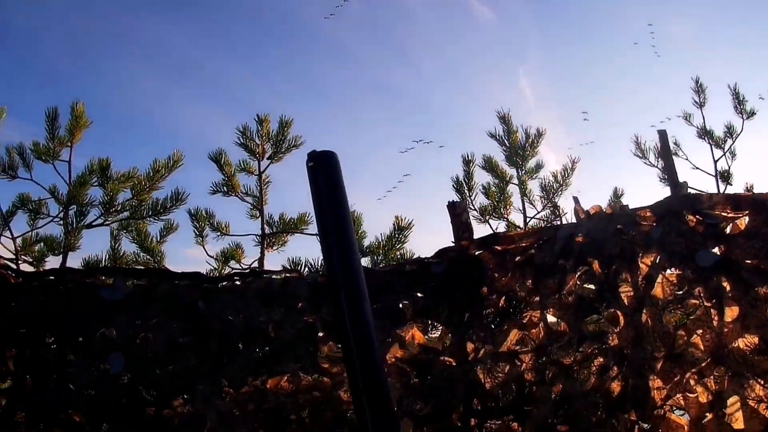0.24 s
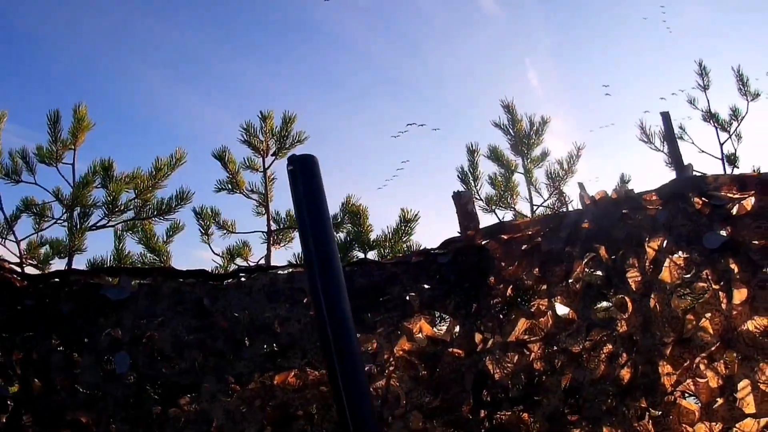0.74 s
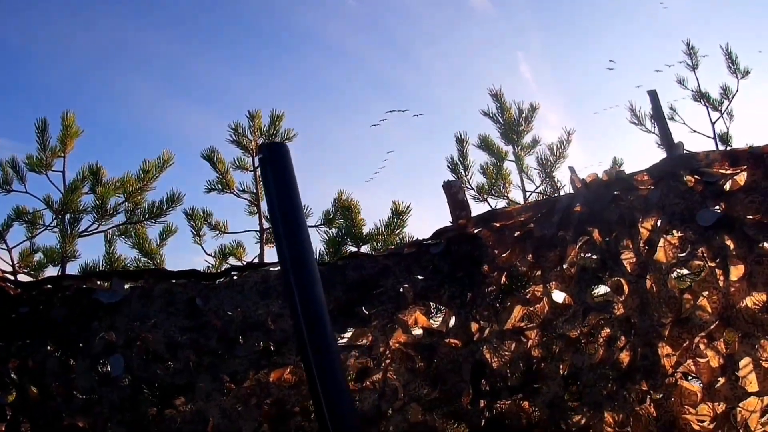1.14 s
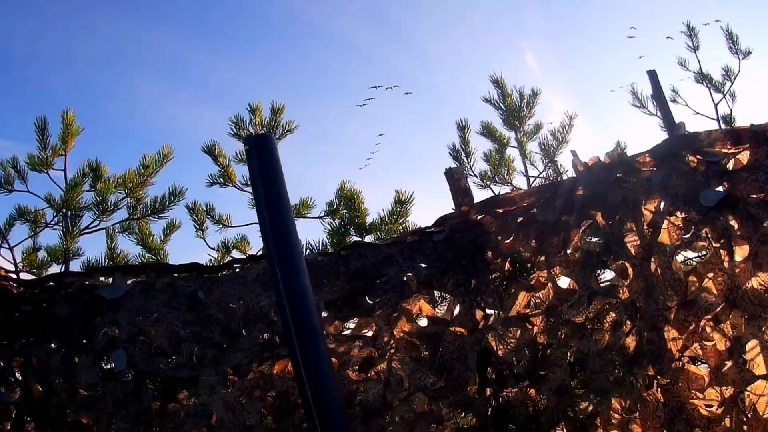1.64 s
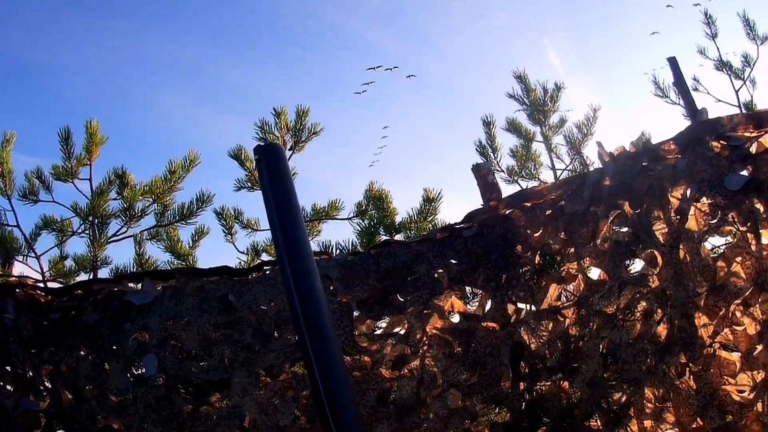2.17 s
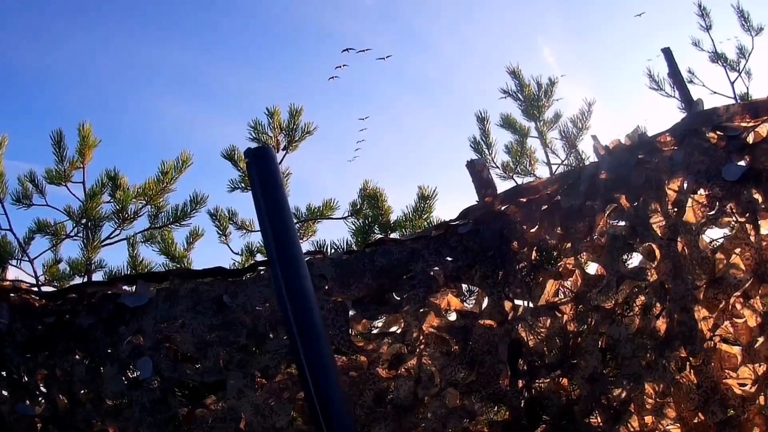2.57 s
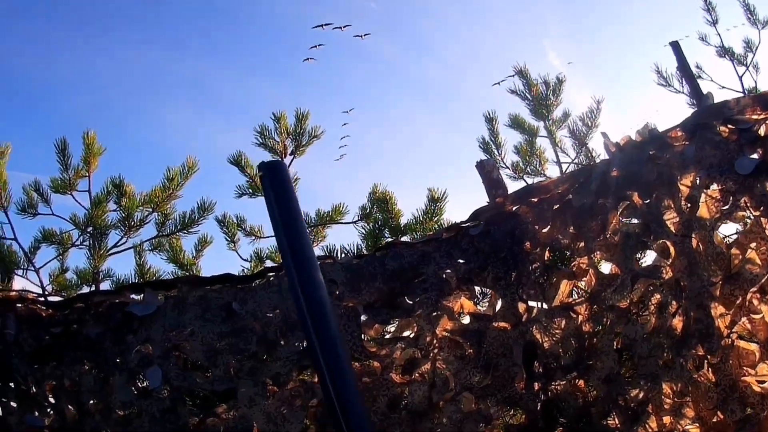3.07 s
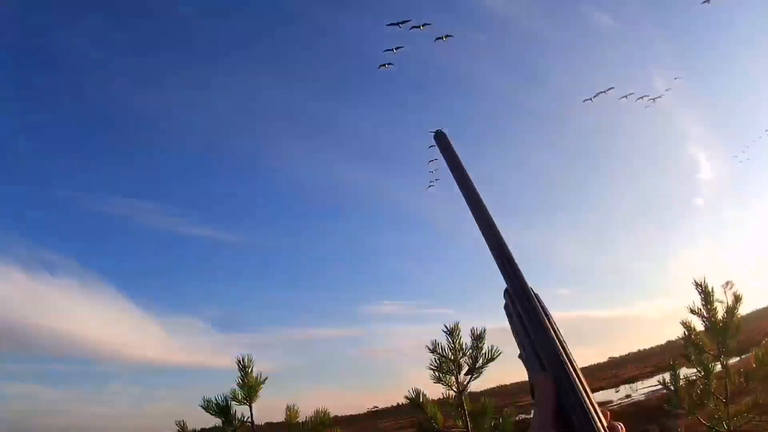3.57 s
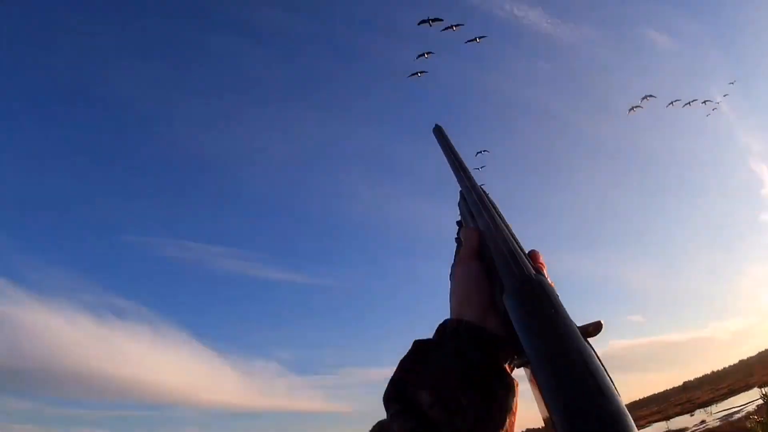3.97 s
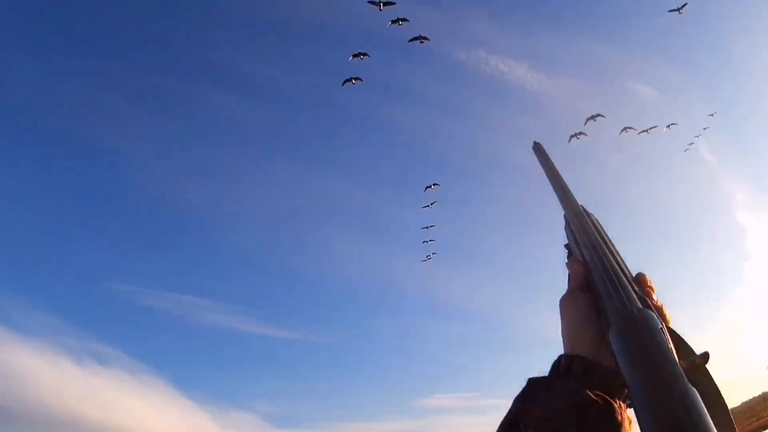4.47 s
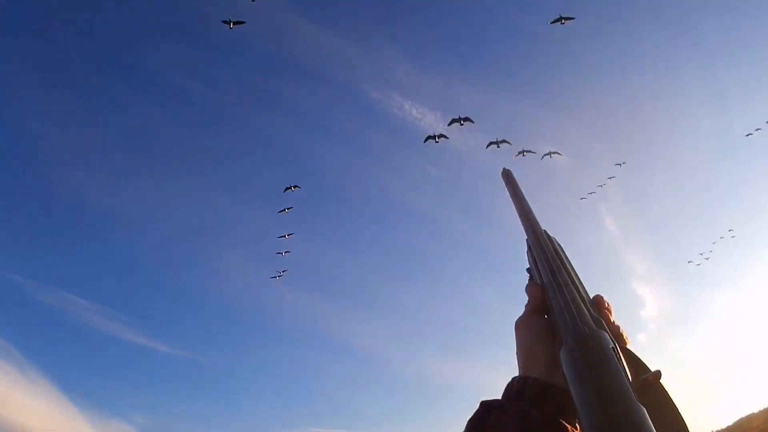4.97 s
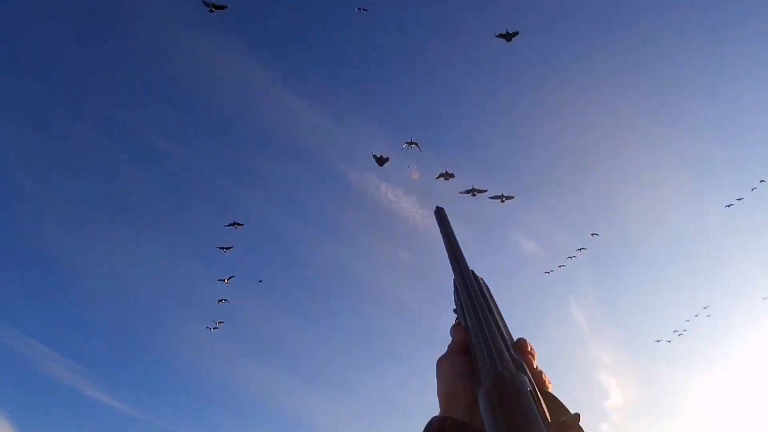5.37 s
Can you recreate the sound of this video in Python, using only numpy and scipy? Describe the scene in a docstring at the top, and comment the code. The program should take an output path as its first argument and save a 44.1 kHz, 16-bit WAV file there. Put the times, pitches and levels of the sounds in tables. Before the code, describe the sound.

Outdoors, heard from a hunter's own position: a restless goose chorus with brief single honks standing out, swelling and dipping in loudness. Midway come small gun clicks, a soft low stock thud and muffled clothing. Near the end a very loud, clipped blast hits, followed by quick steel clatter and a fading, noisy rumble across the open land. The sound is the same on both channels.

```python
"""Geese are heard first, over a hide on an open bog: single honks out of a rough, swelling chorus.
Each honk is a stack of harmonics through windpipe and beak; the air is a soft hiss of coloured noise.
In the hide a hunter makes ticks of metal and bumps of cloth, and the stock thuds on the shoulder.
One shot of a self-loading shotgun, a burst of noise, overloads the microphone; the bolt slams back and
forward as ringing steel, and the report rolls away over the bog as slowly fading noise."""
import sys
import numpy as np
from scipy import signal
from scipy.fft import rfft, irfft, next_fast_len
from scipy.io import wavfile
from scipy.ndimage import uniform_filter1d

SR = 44100
rng = np.random.default_rng(int(sys.argv[2]) if len(sys.argv) > 2 else 0)


def unload_audio(sound):
    """Save the sound as a 16-bit wav file, at the path given as the first command line argument."""
    columns = np.transpose(np.atleast_2d(sound))
    # keep every value between -1 and 1, then stretch to whole-number steps
    steps = np.round(np.clip(columns, -1, 1) * 32767)
    wavfile.write(sys.argv[1], SR, steps.astype(np.int16))


N = 247401  # samples

# Colour of the open air, relative: (f/Hz, level/dB)
AIR_COLOUR = [(13, -28), (22, -1.5), (740, -3.5), (897, -2), (1120, 6.5), (1880, -15.5), (3090, -19),
              (7240, -33), (7860, -18), (9020, -27), (10300, -25.5), (15600, -25)]
AIR_DB = -55.5  # before its slow wavering

# Chorus of the whole flock, swelling and pausing, before FLOCK_TRIM_DB: (t/s, level/dB)
FLOCK_LEVEL = [(0.0, -51), (0.06, -39.5), (0.35, -43), (0.53, -54), (0.72, -45), (0.76, -60), (0.92, -34.5),
               (1.07, -47.5), (1.64, -38.5), (1.77, -42.5), (1.85, -38.5), (1.88, -47), (2.05, -36),
               (2.42, -54), (2.48, -38.5), (2.64, -37), (2.7, -42.5), (3.13, -39), (3.19, -56.5),
               (3.33, -38), (3.39, -52), (3.49, -38.5), (3.58, -52.5), (3.71, -37.5), (4.17, -39),
               (4.27, -47), (4.48, -36), (4.56, -47.5), (4.64, -38), (4.86, -43.5), (4.89, -53.5),
               (4.97, -41.5), (5.05, -55), (5.15, -36), (5.21, -48.5), (5.27, -42)]
# Kinds of voice in the flock: (pitch f/Hz, pitch spread/share)
FLOCK_VOICES = [(270.6, .06), (457.6, 0.09), (869.4, 0.074), (300.5, 0.071)]
# Overtones above the beak in the flock, relative: (f/Hz, level/dB)
FLOCK_OVERTONES = [(1710, -15), (2900, -59), (3490, -21), (4150, 7), (6440, 9), (7040, 9), (9930, -2.5),
                   (15000, -18)]
FLOCK_TRIM_DB, FLOCK_TREBLE_DB = -1.5, -21.5

# Honks of near birds, pitch taken mid-call, windpipe and treble relative to the beak:
# (t/s, length/s, pitch f/Hz, glide start to end/share of pitch, level/dB, windpipe level/dB, treble level/dB)
NEAR_HONKS = [(0.045, 0.065, 296, -0.013, -47.5, -13, -20), (0.113, 0.13, 436.0, -0.11, -66, 12, -28.0),
              (0.215, 0.12, 268.3, -0.017, -41.5, -16, -22), (0.281, 0.1, 323, -0.056, -45.5, -19.0, -14),
              (0.363, 0.069, 320.6, -0.047, -48.5, -27, -9), (0.448, 0.082, 306.5, 0.024, -53, -3, -20.0),
              (0.544, 0.15, 283, -0.0088, -67, 9.5, -2), (0.786, 0.095, 498.0, -0.073, -50.5, -17, -20),
              (0.851, 0.16, 822, -0.059, -51.5, 2.5, -23),
              (0.856, 0.14, 274.6, -0.037, -44.5, -20.0, -36.0),
              (0.956, 0.11, 445, -0.14, -45.5, -3, -27.0), (1.105, 0.061, 288, -0.053, -48.5, -14.0, -33),
              (1.173, 0.15, 423, -0.12, -55.5, 3.5, -20), (1.3, 0.091, 305, 0.09, -53, -12.0, -37),
              (1.405, 0.22, 414.6, -0.039, -52, 3, -29), (1.416, 0.083, 268, -0.015, -41.5, -14, -28),
              (1.514, 0.067, 294.6, -0.027, -64, 4.0, -31.0), (1.52, 0.12, 856, -0.026, -46.5, -8, -26),
              (1.596, 0.12, 808.0, 0.025, -51, -11.0, -30), (1.604, 0.12, 954, -0.0043, -44.5, -25.0, -37),
              (1.812, 0.059, 945.0, -0.0082, -35.5, -11, -22),
              (1.898, 0.05, 332.0, 0.0078, -46, -22.0, -17), (1.954, 0.12, 783, 0.12, -52.0, 3.5, -30),
              (2.023, 0.097, 934, -0.053, -44.5, -29.0, -16), (2.049, 0.12, 280.5, -0.053, -43.5, -15, -25),
              (2.098, 0.056, 825, 0.058, -49.5, 2.0, -7), (2.302, 0.093, 847, -0.2, -58, 2, -29),
              (2.447, 0.17, 463.6, -0.048, -52.5, 1.5, -8), (2.472, 0.26, 464.0, 0.06, -46, -22.0, -36),
              (2.583, 0.12, 946, -0.033, -38.5, -29.0, -17.5), (2.701, 0.12, 463, 0.032, -46.5, -19.0, -13),
              (2.821, 0.14, 269.3, 0.0064, -45, -8, -19), (2.893, 0.081, 408.6, -0.022, -46, 1, -8),
              (2.973, 0.081, 1025, -0.056, -39.5, -19, -31), (3.051, 0.15, 402.4, -0.042, -48.6, -4, -18),
              (3.066, 0.094, 928, -0.076, -43, -23, -17), (3.253, 0.07, 485, -0.028, -50.5, -4.5, -9),
              (3.289, 0.1, 285, 0.07, -48, -7.0, -15), (3.392, 0.077, 457, -0.074, -51, -16.0, -14.5),
              (3.453, 0.079, 930, -0.046, -39.5, -16.0, -24), (3.674, 0.12, 499, -0.037, -42.5, -8, -12),
              (3.701, 0.062, 1019, -0.12, -39.5, -0.5, -8), (3.707, 0.056, 1105, 0.0, -48, -6.0, -1),
              (3.803, 0.078, 944, -0.039, -34, -14, -37), (3.88, 0.06, 325.0, -0.0065, -60, -7.0, -28),
              (3.883, 0.079, 990.0, -0.101, -60, -11.0, -25), (3.946, 0.085, 294, 0.033, -49, -5.0, -45),
              (4.021, 0.16, 277.8, -0.066, -45, -0.5, -20), (4.124, 0.085, 853, -0.065, -46, 1.5, -20),
              (4.173, 0.086, 811, 0.059, -52, -17.0, -28), (4.251, 0.084, 295.6, -0.041, -63.5, 8.0, -13.0),
              (4.327, 0.087, 945, -0.0068, -42.5, -4.5, -17), (4.381, 0.12, 897, 0.04, -55, -14, -19.0),
              (4.409, 0.13, 494.5, -0.044, -51.5, -12, -33.0),
              (4.432, 0.075, 277, -0.029, -42.5, -21.0, -17), (4.595, 0.09, 299.4, 0.0076, -45.5, -14, -29),
              (4.687, 0.13, 448.0, -0.08, -47.5, -4, -19), (4.791, 0.081, 977, 0.11, -54, 6.0, -24),
              (4.947, 0.091, 912, -0.15, -45.5, -17, -33), (5.073, 0.068, 266, 0.059, -51.5, -6, -33.0),
              (5.113, 0.065, 484, 0.022, -43.5, 0, -32), (5.131, 0.088, 746, -0.024, -48.5, -14, -32),
              (5.208, 0.29, 268.6, 0.0, -45.5, -1, -35)]
# Overtones above the beak in near birds, relative: (f/Hz, level/dB)
NEAR_OVERTONES = [(2800, -4.5), (3700, 4.5), (4700, 3.5), (5800, 5.5), (7500, 1.5), (10000, -8),
                  (15000, -17)]
# Beak resonance of near birds, which goes with the voice: (pitch f/Hz, resonance f/Hz)
NEAR_BEAK_BY_PITCH = [(300, 1853), (400, 1780), (480, 2100), (800, 1770), (1050, 2160)]
ARCH = 0.0212  # share by which both ends of a near honk lie under its middle, before the breath sags

# Resonances inside a goose; a width is taken where the gain has halved
WINDPIPE_HZ, WINDPIPE_WIDTH_HZ = 949, 530
CHEST_HZ, CHEST_WIDTH_HZ, CHEST_DB = 302, 196, -18
FLOCK_BEAK_HZ, BEAK_WIDTH_HZ = 1864, 400  # the flock's beaks scatter about this centre

# Ticks of gun metal and sling, level before attack and decay: (t/s, level/dB, f/Hz, width f/Hz)
METAL_TICKS = [(3.151, -41, 6000, 7000), (3.7917, -33, 4670, 3500), (3.805, -32, 6900, 9000),
               (3.8135, -47, 13000, 2000), (4.118, -35.5, 6440, 2490), (5.063, -41.5, 6700, 1780)]
# Bumps of clothing, level at the peak before patchiness: (t/s, level/dB)
CLOTH_BUMPS = [(3.75, -50.5), (3.875, -56.5), (3.978, -56), (4.14, -54.5), (4.44, -52)]
BUMP_RISE_DB_S, BUMP_FALL_DB_S = 150, 83
THUD_S, THUD_DB, THUD_HZ, THUD_T60_S = 3.742, -39, 110, 0.043  # the stock meets the shoulder

# Colour of the muzzle blast, relative: (f/Hz, level/dB)
MUZZLE_COLOUR = [(20, 1.5), (60, 2), (200, -5), (500, -2), (900, 0.5), (2000, -11), (4000, -9.5),
                 (8000, -13), (11000, -15), (15600, -26)]
# Colour of the report rolling over the bog, relative: (f/Hz, level/dB)
REPORT_COLOUR = [(15, -31), (25, -12), (59, -13), (617, -1), (744, -4.5), (829, -10), (923, -1), (1090, -4),
                 (2790, -15), (10700, -29), (15600, -42)]
# The bolt hits its stops, peak level ahead of the microphone: (t/s, level/dB, brightness/dB per octave)
BOLT_HITS = [(5.4088, -18, -1), (5.4114, -9, -5), (5.4151, 0.5, -1.5), (5.4189, 2, -1), (5.4213, -8.5, 0.3),
             (5.4269, -12, -3), (5.5273, 0, -4.5), (5.5348, -14.5, -6.5)]
# Ringing modes of the receiver, levels relative, pitch before a small scatter: (f/Hz, level/dB, t60/s)
RECEIVER_MODES = [(925, 3, 0.012), (1425, 2, 0.0076), (1820, -15.5, 0.02), (2670, -37, 0.012),
                  (3710, 6, 0.0063), (4320, -6.5, 0.018), (4940, 3.5, 0.0071), (5930, -5, 0.019),
                  (6830, -3, 0.018), (7530, -0.5, 0.014), (7930, -13, 0.036)]
SHOT_S, BLAST_DB, BLAST_HOLD_S, BLAST_T60_S = 5.3125, 1.5, 0.014, 0.032
SWELL_DB, SWELL_DB_S = -17, 1100  # a short hiss swells just ahead of the blast
ECHO_DB, ECHO_T60_S = -10.5, 0.26  # near trees and hide throw the blast back
ROLL_DB, ROLL_RISE_S, ROLL_T60_S = -25, 0.078, 1.85  # scattered back from the bog, before rise and fade

TOP_HZ = 15780  # upper limit of the microphone channel


def undb(db):
    """Turn dB into an amplitude factor."""
    return 10 ** (np.asarray(db) / 20)


def unit(x):
    """Scale to rms 1."""
    return x / np.sqrt(np.mean(x ** 2))


def colour_db(hz, points):
    """Read (f/Hz, level/dB) points on a log frequency axis."""
    at_hz, db = np.transpose(points)
    return np.interp(np.log(np.maximum(hz, 1)), np.log(at_hz), db)


def noise(points):
    """Noise of rms 1 with the given colour."""
    size = next_fast_len(N)
    hz = np.arange(size // 2 + 1) * SR / size
    spectrum = rfft(rng.standard_normal(size)) * undb(colour_db(hz, points))
    return unit(irfft(spectrum, size)[:N])


def curve(table):
    """Level in dB over time; the ends are held."""
    return np.interp(np.arange(N) / SR, *np.transpose(table))


def walk(count, rate):
    """Smooth chance that changes rate times a second; spread near 1."""
    knots = rng.standard_normal(count // 8 + 2)
    return 1.31 * np.interp(np.arange(count) * rate / SR, np.arange(len(knots)), knots)


def add(out, s, x):
    """Mix x into out from time s."""
    i = max(int(s * SR), 0)
    out[..., i:i + x.shape[-1]] += x[..., :N - i]


def fade(t, t60):
    """Exponential decay from t = 0, down 60 dB after t60; silent before."""
    return (t >= 0) * np.exp(-np.log(1000) * np.maximum(t, 0) / t60)


def resonance(hz, centre_hz, width_hz):
    """Gain of a resonance passed twice."""
    return 1 / (1 + ((hz - centre_hz ** 2 / hz) / width_hz) ** 2)


def air():
    """Soft hiss of the open bog: coloured noise with a slowly wavering level."""
    waver_db = 0.8 * walk(N, 12)
    return undb(AIR_DB) * undb(waver_db) * noise(AIR_COLOUR)


def honk(length, start_hz, mid_hz, end_hz, beak_hz, pipe_db, overtones, rough, edge):
    """One honk as (body, treble): an arched harmonic stack through windpipe and beak, shaken by hoarseness."""
    u = np.arange(int(length * SR)) / (length * SR)  # 0 to 1 through the call
    # a parabola through start, middle and end
    hz = start_hz * (1 - u) * (1 - 2 * u) + 4 * mid_hz * u * (1 - u) + end_hz * u * (2 * u - 1)
    hz = hz * (1 - 0.08 * u ** 6 - 0.03 * (1 - u) ** 8)  # the pitch sags while the breath builds and fails
    shaken_hz = hz * (1 + 0.02 * rough * walk(len(u), 300))
    phase = 2 * np.pi * np.cumsum(shaken_hz) / SR

    k = np.arange(1, int(15000 / mid_hz) + 1)[:, None]  # partials up to 15 kHz
    start_phase = 2 * np.pi * rng.random(k.shape)
    waves = np.cos((k * phase + start_phase).astype(np.float32))
    partial_hz = k[:, 0] * mid_hz

    beak = resonance(partial_hz, beak_hz, BEAK_WIDTH_HZ)
    pipe = resonance(partial_hz, WINDPIPE_HZ, WINDPIPE_WIDTH_HZ)
    pipe = pipe / (1 + (760 / partial_hz) ** 8)  # little radiates below the windpipe
    body = beak / np.linalg.norm(beak) + undb(pipe_db) * pipe / np.linalg.norm(pipe)
    body = body + undb(CHEST_DB) * resonance(partial_hz, CHEST_HZ, CHEST_WIDTH_HZ)
    top = undb(colour_db(partial_hz, overtones)) * (partial_hz > 2800)

    uneven = undb(1.5 * rng.standard_normal(len(k)))  # no two throats weigh the partials alike
    body = body * uneven
    top = top * uneven ** 3

    breath = np.minimum(1, np.minimum(u / edge, (1 - u) / (1.33 * edge)))
    flutter_db = 7 * rough * np.tanh(walk(len(u), 400))  # hoarseness
    breath = breath * undb(flutter_db)
    return np.sqrt(2) * breath * np.array([body @ waves, top / np.linalg.norm(top) @ waves])


def flock(count=270):
    """Many short hoarse honks overlap, each with its own pitch, glide and beak, under a swelling level."""
    out = np.zeros((2, N))  # body and treble
    for i, c in enumerate(rng.standard_normal((count, 8))):
        pitch_hz, spread = FLOCK_VOICES[i % len(FLOCK_VOICES)]
        hz = pitch_hz * (1 + spread * np.tanh(c[0]))
        glide_hz = hz * np.array([0.95 + 0.05 * c[6], 1, 0.91 + 0.05 * c[7]])  # start, middle, end
        length = 0.095 + 0.0209 * np.tanh(c[1])
        beak_hz = FLOCK_BEAK_HZ * (1 + 0.16 * np.tanh(c[2]))
        pipe_db = -3 + 3 * c[3]
        rough = 0.5 + 0.3 * np.tanh(c[5])
        call = honk(length, *glide_hz, beak_hz, pipe_db, FLOCK_OVERTONES, rough=rough, edge=0.35)
        add(out, (i + 0.5 * c[4]) * 5.55 / count - 0.06, call)
    # divide by the smoothed loudness, so that the level curve alone sets the chorus's swelling
    power = uniform_filter1d(uniform_filter1d(out ** 2, 3000), 3000)
    out /= np.sqrt(power + 1e-3)
    body, treble = out
    return undb(curve(FLOCK_LEVEL) + FLOCK_TRIM_DB) * (body + undb(FLOCK_TREBLE_DB) * treble)


def near_geese():
    """The honks that stand out; deep voices are hoarser; the beak resonance goes with the pitch."""
    out = np.zeros(N)
    for s, length, hz, glide, db, pipe_db, treble_db in NEAR_HONKS:
        beak_hz = np.interp(hz, *np.transpose(NEAR_BEAK_BY_PITCH))
        start_hz, end_hz = hz * (1 - ARCH + np.array([-glide, glide]) / 2)
        rough = 0.05 + 35 / hz
        body, treble = honk(length, start_hz, hz, end_hz, beak_hz, pipe_db, NEAR_OVERTONES, rough, edge=0.2)
        add(out, s, undb(db) * (body + undb(treble_db) * treble))
    return out


def metal_ticks():
    """Gun metal and sling: a few ms of ringing noise each, narrowed by a resonance."""
    out = np.zeros(N)
    t = np.arange(600) / SR
    band_hz = np.arange(len(t) // 2 + 1) / len(t) * SR + 1  # 1 Hz up keeps clear of zero
    shape = np.minimum(1, t / 0.00043) * np.exp(-t / 0.0018)
    for s, db, hz, width_hz in METAL_TICKS:
        spectrum = rfft(rng.standard_normal(len(t))) * resonance(band_hz, hz, width_hz)
        ring = unit(irfft(spectrum, len(t)))
        add(out, s, undb(db) * ring * shape)
    return out


def cloth_bumps():
    """Clothes bump as the hunter moves: dull noise that rises and falls in straight dB slopes."""
    patchy_db = 1.5 * walk(N, 30)
    since = [(np.arange(N) / SR - s, db) for s, db in CLOTH_BUMPS]
    slopes_db = [db + np.minimum(BUMP_RISE_DB_S * t, -BUMP_FALL_DB_S * t) for t, db in since]
    level_db = np.max(slopes_db, axis=0) + patchy_db
    return undb(level_db) * noise([(20, -2), (120, -10), (500, -5), (2000, -32), (16000, -31)])


def stock_thud():
    """The stock meets the shoulder: one low, quickly damped sine."""
    after = np.arange(N) / SR - THUD_S
    return undb(THUD_DB) * fade(after, THUD_T60_S) * np.sin(2 * np.pi * THUD_HZ * after)


def shot():
    """Swell, blast and near echo share one noise; the rolling report is a slower, patchy one."""
    since = np.arange(N) / SR - SHOT_S
    swell = (since < 0) * undb(SWELL_DB + SWELL_DB_S * np.minimum(since, 0))
    held = fade(np.maximum(since - BLAST_HOLD_S, 0), BLAST_T60_S)
    blast = undb(BLAST_DB) * (since >= 0) * held
    echo = undb(ECHO_DB) * fade(since, ECHO_T60_S)
    roll = (1 - np.exp(-np.maximum(since, 0) / ROLL_RISE_S)) * fade(since, ROLL_T60_S)
    patchy_db = 1.5 * walk(N, 40)
    report = roll * undb(ROLL_DB + patchy_db) * noise(REPORT_COLOUR)
    return (swell + blast + echo) * noise(MUZZLE_COLOUR) + report


def bolt():
    """The bolt hits its stops and the receiver rings in damped sine modes."""
    out = np.zeros(N)
    t = np.arange(2000) / SR
    hz, mode_db, t60 = np.transpose(RECEIVER_MODES)[:, :, None]
    scatter = rng.standard_normal((len(BOLT_HITS), len(RECEIVER_MODES), 1))
    for (s, db, tilt_db), c in zip(BOLT_HITS, scatter):
        mode_level = undb(mode_db + tilt_db * np.log2(hz / 2000))
        modes = mode_level * np.sin(2 * np.pi * hz * (1 + 0.022 * c) * t)
        # loose parts rattle and smear the rings
        rattle = np.array([walk(len(t), 1500) for _ in hz])
        modes *= 1 + 0.7 * rattle * (hz > 1200)
        ring = np.minimum(1, t / 0.00079) * (modes * fade(t, t60)).sum(axis=0)
        add(out, s, undb(db) * ring / np.abs(ring).max())
    return out


def scene():
    """Geese over the bog with their ground reflection, then the hunter and the gun."""
    geese = flock() + near_geese()
    lag = int(0.014 * SR)
    geese[lag:] += undb(-20) * geese[:-lag]  # once more off the wet ground
    hunter = metal_ticks() + cloth_bumps() + stock_thud()
    sound = air() + geese + hunter + shot() + bolt()
    return np.array([sound, sound])


def record(dry):
    """One microphone on both channels; the blast hits the rails; the top is cut."""
    railed = dry / (1 + np.abs(dry / 0.8) ** 6) ** (1 / 6)
    top_cut = signal.ellip(10, 0.2, 80, TOP_HZ, fs=SR, output="sos")
    return signal.sosfilt(top_cut, railed)


dry = scene()
out = record(dry)
unload_audio(out)
```